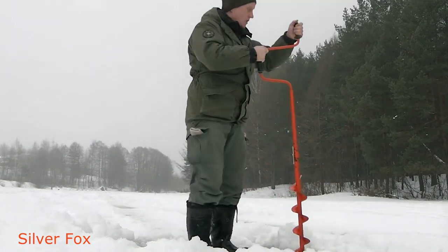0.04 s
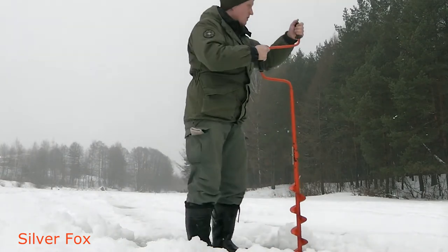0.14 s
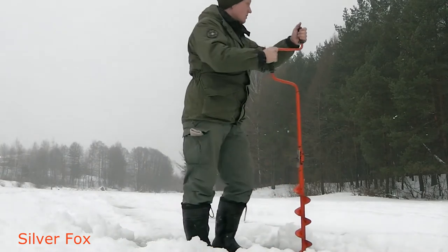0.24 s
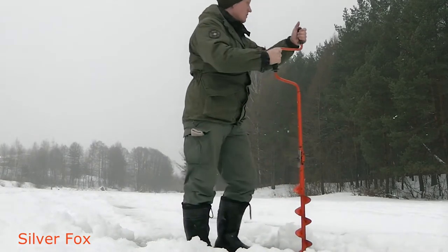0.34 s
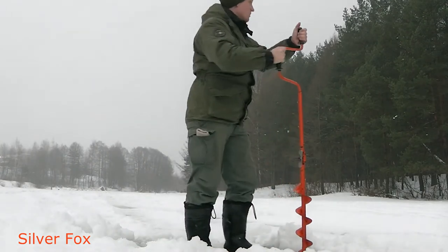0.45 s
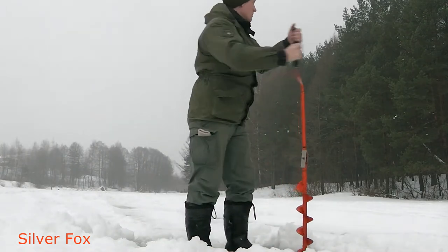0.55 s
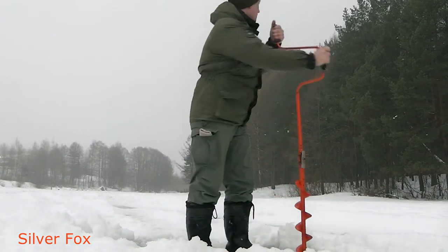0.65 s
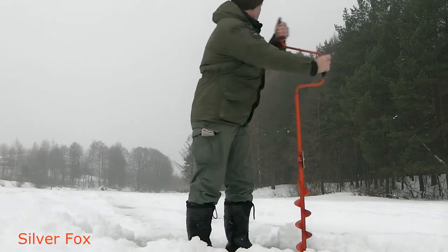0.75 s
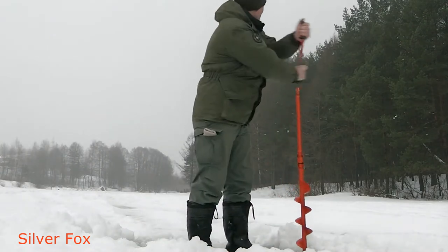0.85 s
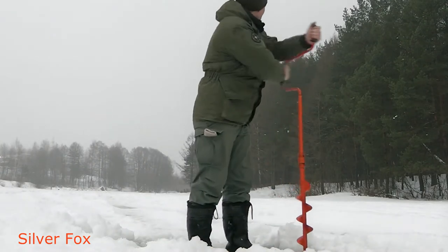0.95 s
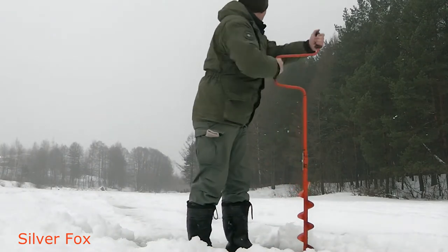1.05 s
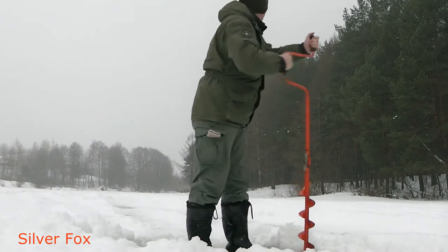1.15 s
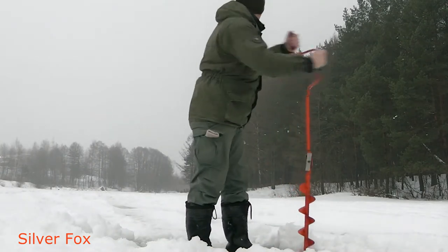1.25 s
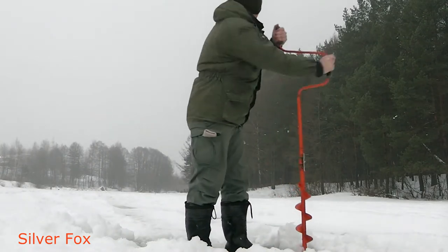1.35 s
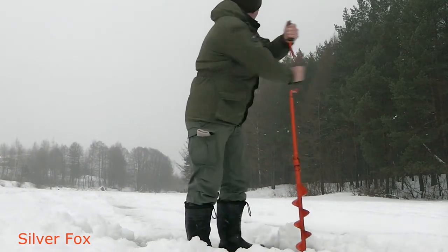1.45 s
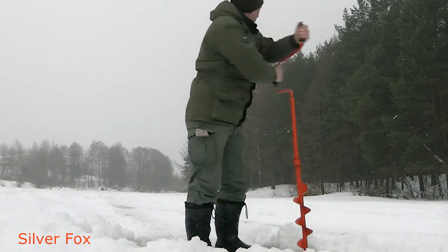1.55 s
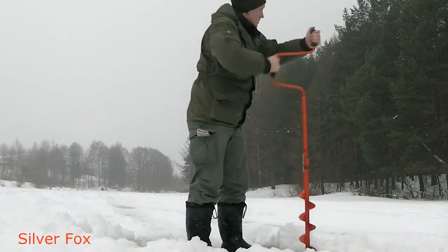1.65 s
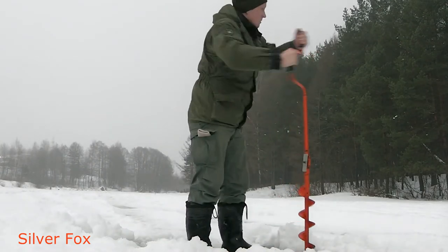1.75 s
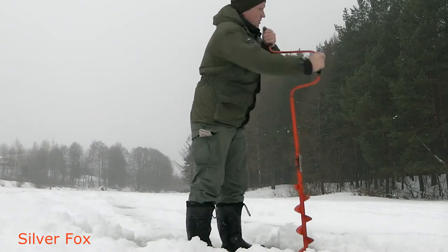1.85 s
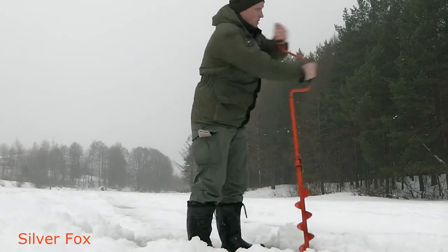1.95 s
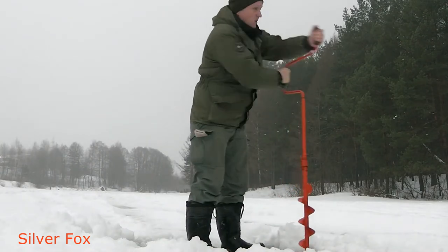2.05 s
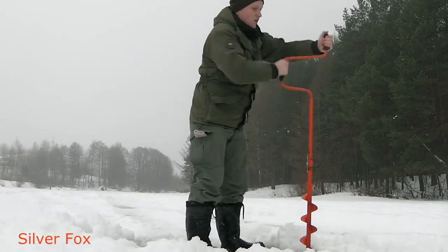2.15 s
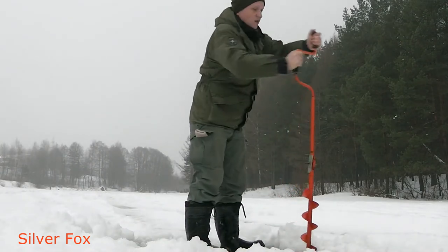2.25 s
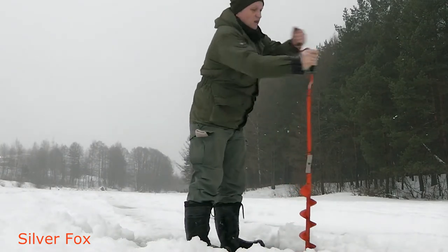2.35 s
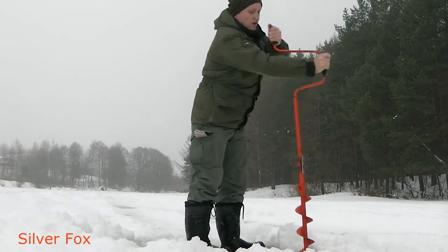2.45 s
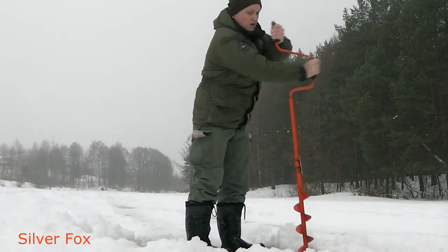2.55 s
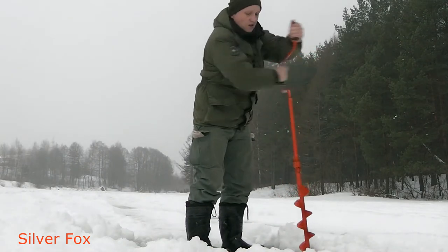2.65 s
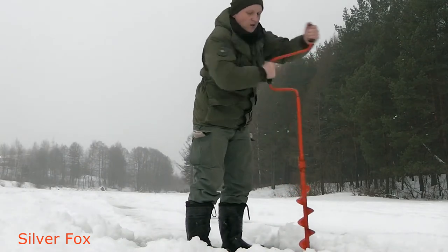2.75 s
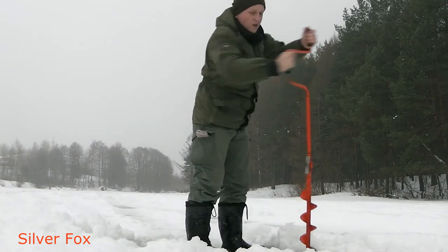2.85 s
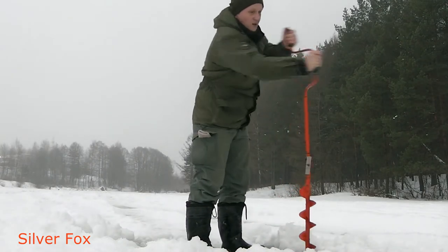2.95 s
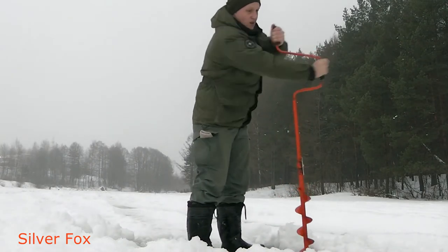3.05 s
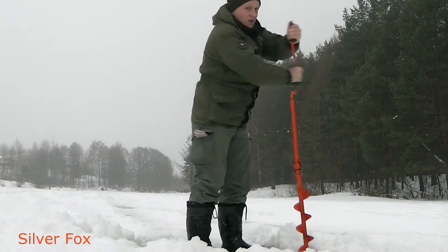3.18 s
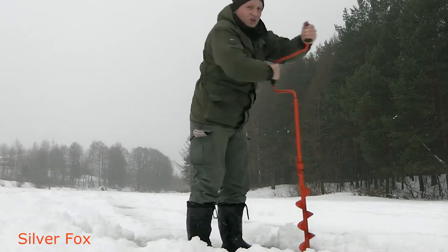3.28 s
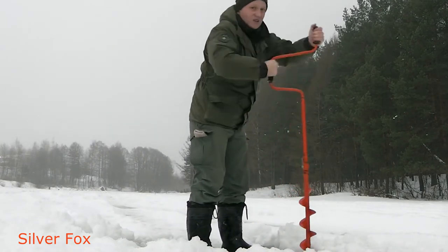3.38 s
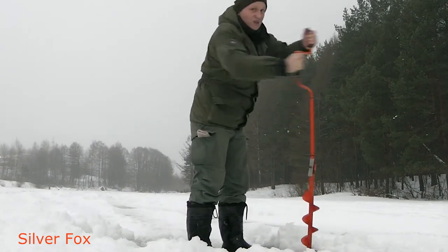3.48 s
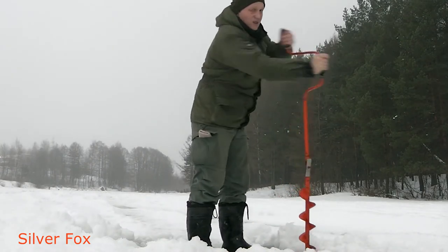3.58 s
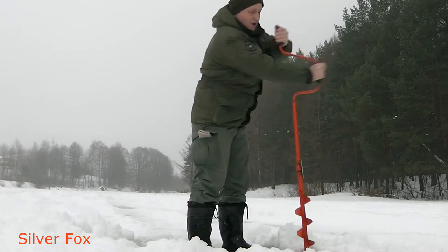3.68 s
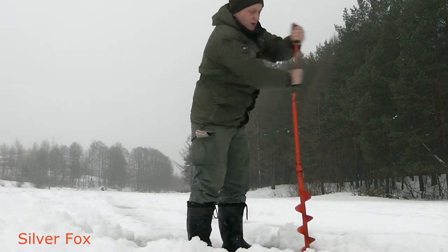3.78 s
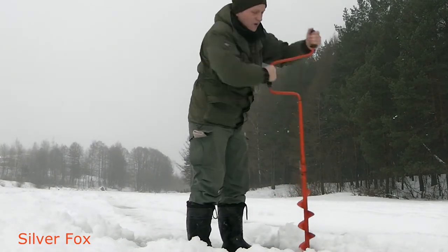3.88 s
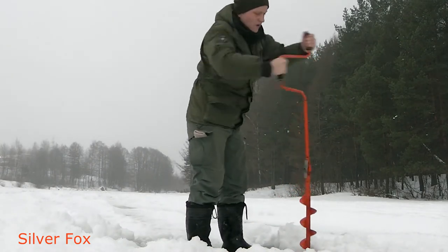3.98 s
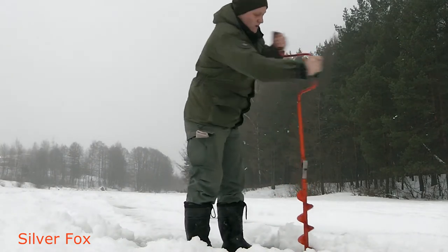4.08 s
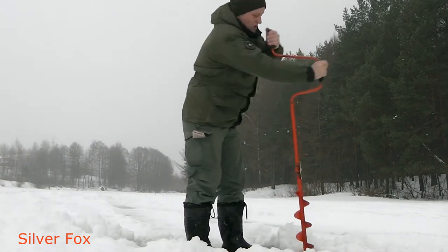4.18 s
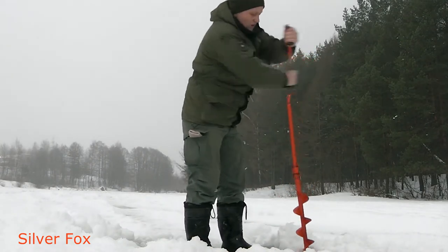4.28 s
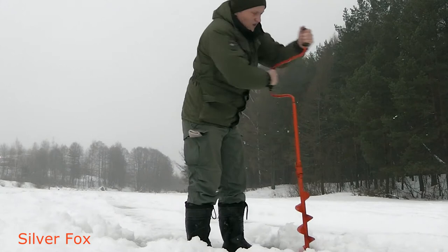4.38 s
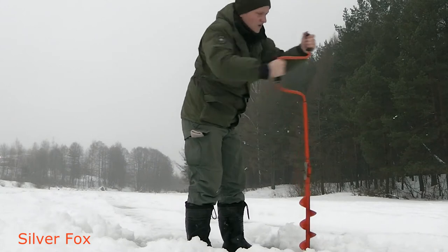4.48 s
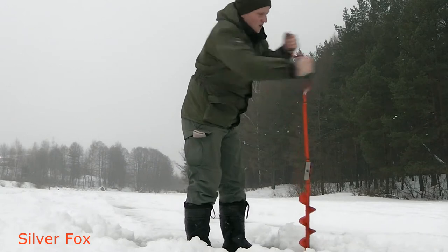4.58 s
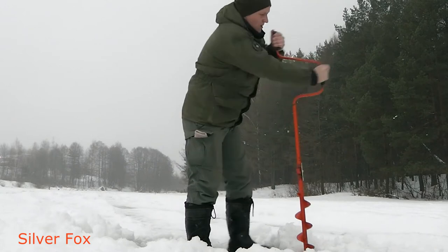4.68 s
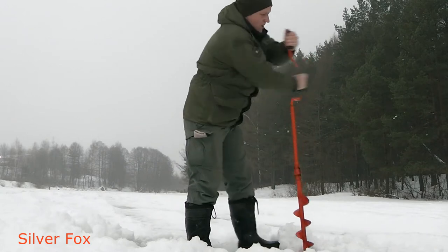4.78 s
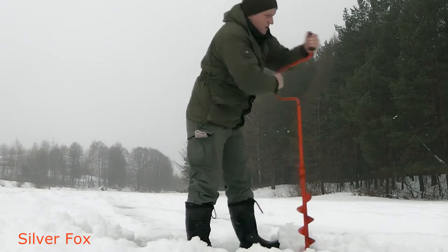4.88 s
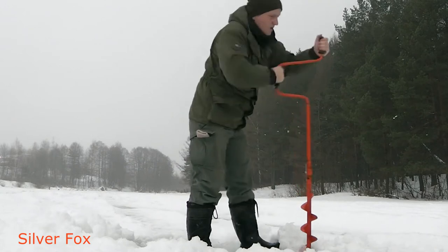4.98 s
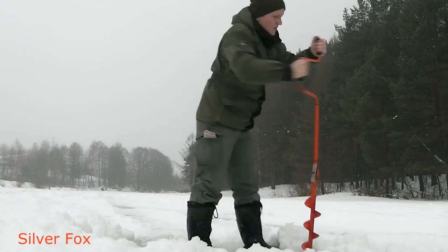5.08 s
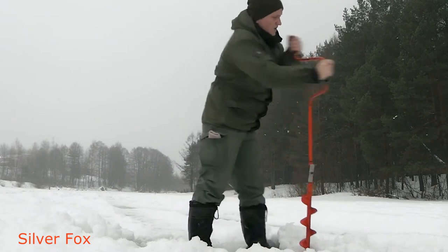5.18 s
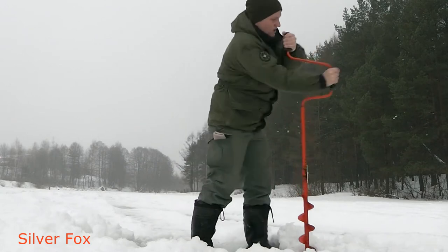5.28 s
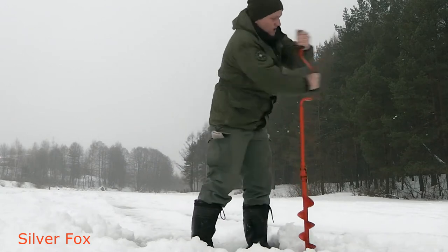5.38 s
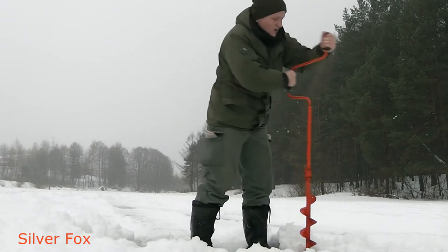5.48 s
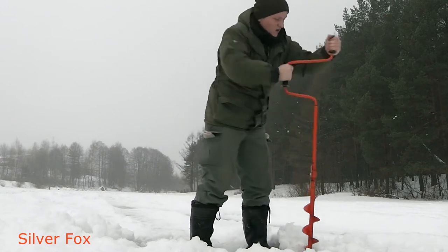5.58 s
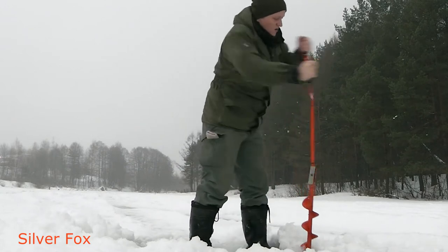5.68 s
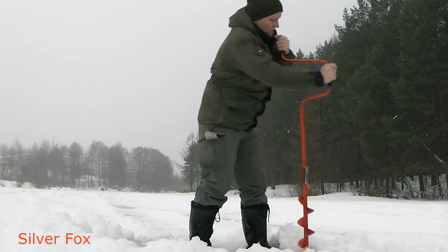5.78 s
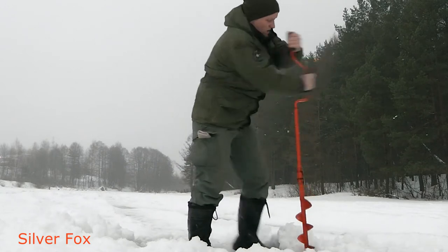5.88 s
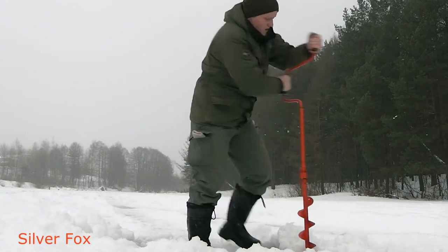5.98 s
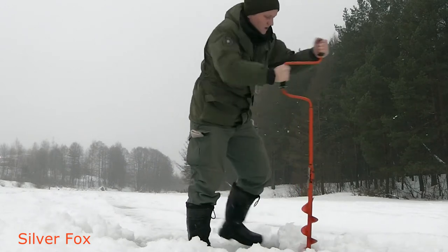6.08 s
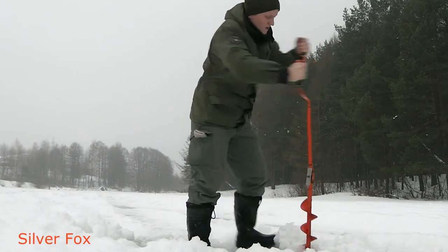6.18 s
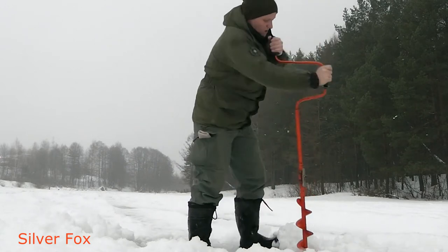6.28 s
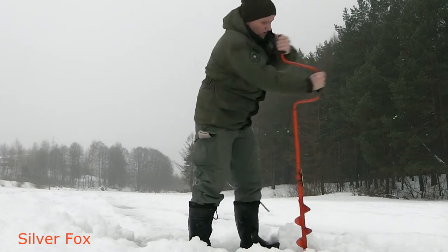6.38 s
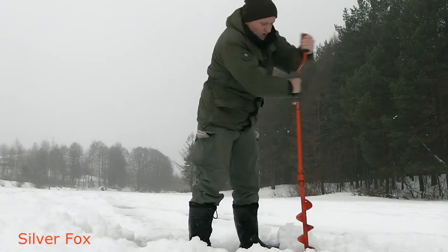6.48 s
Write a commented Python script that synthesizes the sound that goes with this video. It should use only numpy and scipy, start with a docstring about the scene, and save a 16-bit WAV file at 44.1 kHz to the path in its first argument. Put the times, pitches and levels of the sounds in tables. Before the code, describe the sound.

Rhythmic icy grinding as a manual drill bites down, its hole resonating lower and lower, steel ringing, shavings hissing and lumps snapping in light wind.

```python
"""A hand auger is cranked down through river ice, a few metres from the microphone on open snow.
Its blades shear off random chips: the air in the hole resonates and booms at a sinking, wavering
pitch, the steel shaft rings in narrow modes and the shavings hiss as clumped, coloured noise.
Crumbs crunch, lumps crack as short noise bursts, a boot scuffs and dull knocks swing low.
Light wind and a distant wash, both filtered noise, lie underneath."""
import sys
import numpy as np
from scipy import signal
from scipy.fft import rfft, irfft, next_fast_len
from scipy.io import wavfile
from scipy.ndimage import uniform_filter1d

SR = 44100
rng = np.random.default_rng(int(sys.argv[2]) if len(sys.argv) > 2 else 0)


def amplitude_ratio(level_db):
    """Convert a level in decibels to the matching linear amplitude (field) ratio."""
    exponent = np.asarray(level_db, float) / 20
    return 10 ** exponent


def to_wav(sig):
    """Store sig (one row per channel, or 1-D mono) as 16-bit WAV at the path in sys.argv[1].

    Samples outside -1..1 are clipped; the rate is SR.
    """
    pcm = np.clip(np.atleast_2d(sig), -1, 1) * 32767
    pcm = np.round(pcm).astype(np.int16)
    wavfile.write(sys.argv[1], SR, pcm.T)  # frames by channels


N = 287973  # length [samples]


def evened(x):
    """Scales to rms 1."""
    return x / np.sqrt(np.mean(abs(x) ** 2) + 1e-20)


def read(points, hz):
    """Reads a spectrum on a log-frequency axis."""
    point_hz, value = np.transpose(points)
    return np.interp(np.log(hz + 1), np.log(point_hz + 1), value)


def curves(rows):
    """Every column of a table at sample rate, against its first column, time."""
    s, *columns = np.transpose(rows)
    return [np.interp(np.arange(N) / SR, s, column) for column in columns]


def swells(rows, rest_db, rise, fall, column=2):
    """Level in dB: each row rises, holds and falls at set dB per second above a resting level."""
    t = np.arange(N) / SR
    power = amplitude_ratio(2 * rest_db)
    for row in rows:
        start, hold = row[0], row[1]
        before = np.maximum(start - t, 0)
        after = np.maximum(t - start - hold, 0)
        power = power + amplitude_ratio(2 * (row[column] - rise * before - fall * after))
    return 10 * np.log10(power)


def colour(x, points):
    """Filters x by a spectrum in dB."""
    size = next_fast_len(N)
    gain = amplitude_ratio(read(points, np.fft.rfftfreq(size, 1 / SR)))
    return irfft(rfft(x, size) * gain, size)[:N]


def resonate(x, hz, width_hz, order=2):
    """A resonance that follows the curve hz: shift down, smooth order times, shift back."""
    turn = np.exp(2j * np.pi * np.cumsum(hz * np.ones(N)) / SR)
    x = x / turn
    for _ in range(order):  # width_hz is that of one pass
        x = signal.lfilter([1], [1, -np.exp(-np.pi * width_hz / SR)], x)
    return evened((turn * x).real)


def wobble(ms):
    """Smooth random curve of rms 1 that changes over about ms."""
    size = max(round(ms * SR / 1000), 1)
    return evened(uniform_filter1d(uniform_filter1d(rng.standard_normal(N), size), size))


def chips(per_s, spread_db):
    """Ice chips breaking off at random moments, as single-sample clicks of random size and sign."""
    size = amplitude_ratio(spread_db * np.minimum(rng.exponential(1, N), 5))
    breaks = rng.random(N) < per_s / SR
    return evened(size * breaks * rng.choice([-1., 1.], N))


def steadied(x, ms, share):
    """Evens out part of the slow random level swings of the noise."""
    size = round(ms * SR / 1000)
    power = uniform_filter1d(uniform_filter1d(x ** 2, size), size)
    return evened(x / (abs(power) + 1e-3) ** (share / 2))


def patchy(x, size, bins, frames, db):
    """Random patches of colour, bins wide and frames long, drift over x."""
    z = signal.stft(x, nperseg=size, noverlap=size * 3 // 4)[2]
    field = uniform_filter1d(rng.standard_normal(z.shape), bins, 0)
    field = uniform_filter1d(field, frames, 1)
    return signal.istft(z * amplitude_ratio(db * evened(field)), nperseg=size, noverlap=size * 3 // 4)[1][:N]


# light wind over open snow: (time [s], level [dB])
WIND_LEVEL = [(0.0, -42), (1.0, -37), (2.1, -40.5), (4.7, -40.5), (5.0, -37.5), (6.05, -38.5), (6.53, -41)]
# colour of wind and far wash: (frequency [Hz], relative density [dB])
AIR_SPECTRUM = [(18, -37), (30, -4.5), (97, 0.5), (187, -5), (245, -11.5), (347, -9.5), (926, -19),
                (1080, -16), (1680, -22), (3000, -48), (3900, -60), (6600, -120)]


def air():
    """Low wind and far wash over the snow: filtered noise whose level drifts."""
    return amplitude_ratio(curves(WIND_LEVEL)[0]) * evened(colour(rng.standard_normal(N), AIR_SPECTRUM))


# how hard and fast the crank feeds the blades, as shavings hiss: (time [s], level [dB])
CRANK_FEED = [(0.0, -53.5), (0.18, -59.5), (0.42, -62), (0.55, -50.5), (0.68, -45.5), (1.0, -45.5),
              (1.4, -37), (1.75, -39), (1.81, -45), (1.9, -36), (2.16, -41), (3.1, -36), (3.37, -39),
              (3.7, -35.5), (4.4, -38), (4.75, -35), (5.0, -39), (5.5, -38.5), (6.17, -38.5), (6.53, -37.5)]


def crank_feed():
    """The harder the crank feeds the blades, the louder the shavings."""
    return curves(CRANK_FEED)[0]


# a boot scuffs the crust: (start [s], hold [s], level [dB])
BOOT_SCUFFS = [(0.192, .03, -49), (0.25, 0.049, -46)]


def scuffs(feed_db):
    """A boot scraping the crust briefly lifts the level of the hiss, with steep edges."""
    return swells(BOOT_SCUFFS, feed_db, rise=900, fall=900)


def squeaks(per_s):
    """Short gliding whistles where an edge skids on hard ice."""
    out, t = np.zeros(N), np.arange(1500) / SR
    for place, glide, length in rng.random((30, 3)):  # thirty kinds of whistle
        hz, length_s = 1900 * 4.2 ** place, 0.0071 + 0.043 * length
        whistle = np.sin(2 * np.pi * hz * t * (1 + 1.87 * (glide - .5) * t))
        grain = whistle * np.sin(np.pi * np.minimum(t / length_s, 1)) ** 2
        out += signal.oaconvolve(chips(per_s / 30, spread_db=2.0), evened(grain))[:N]
    return evened(out)


# colour of the shavings' hiss: (frequency [Hz], relative density [dB])
SHAVINGS_SPECTRUM = [(1470, -12.5), (2500, -14), (3100, -13), (3340, -17), (3690, -9.5), (4050, -9),
                     (5420, -3), (6710, -2.5), (7470, 0), (10400, -5.5), (11700, -13), (14900, -24),
                     (15600, -29)]
# steel modes that colour the hiss: (frequency [Hz], one-pass width [Hz], level against the hiss [dB])
HISS_MODES = [(7640, 270, -28), (5470, 190, -35), (8500, 360, -25), (10300, 330, -31)]
# finest powder: (time [s], level against the hiss [dB])
POWDER_LEVEL = [(0, -7), (3, -15), (6.53, -14)]
# what the steel shaft rings with: (frequency [Hz], one-pass width [Hz], relative level [dB])
SHAFT_MODES = [(1126.5, 57, 1), (1161, 114, -2.5), (1253, 26, -7.5)]


def blades(bite, hiss_db, ring_db):
    """Fine grit hisses in clumps and narrow streaks; coarser chips ring the shaft."""
    grit = rng.standard_normal(N) + .5 * chips(per_s=1100, spread_db=-0.5)
    grit = patchy(grit * bite ** 1.2, size=256, bins=8, frames=45, db=2.5)  # clumps
    grit = patchy(grit, size=1024, bins=3, frames=14, db=1.5)  # streaks
    grit = evened(grit) + amplitude_ratio(-11.5) * squeaks(per_s=300)
    hiss = evened(colour(grit, SHAVINGS_SPECTRUM))
    for hz, width_hz, db in HISS_MODES:  # each mode's level wanders by itself
        hiss = hiss + amplitude_ratio(db + 3.6 * wobble(ms=140)) * resonate(grit, hz, width_hz)
    powder = resonate(rng.standard_normal(N) * bite, hz=12700, width_hz=10000)
    hiss = hiss + amplitude_ratio(curves(POWDER_LEVEL)[0]) * powder
    coarse = chips(per_s=970, spread_db=2.5) * bite
    ring = sum(amplitude_ratio(db) * resonate(coarse, hz, width_hz) for hz, width_hz, db in SHAFT_MODES)
    return amplitude_ratio(hiss_db) * hiss + amplitude_ratio(ring_db) * steadied(ring, ms=39, share=0.15)


# colour of the larger crumbs: (frequency [Hz], relative density [dB])
CRUMB_SPECTRUM = [(500, -27), (850, -5.5), (1050, -7), (1400, -8), (1950, -7.5), (2400, -23.5), (3200, -50)]


def crunch(bite, feed_db, drag_db):
    """Larger crumbs break with a duller, patchy rasp that partly follows feed and drag."""
    level_db = -42.5 + 0.76 * (feed_db + 40) + 0.24 * drag_db
    crumbs = (rng.standard_normal(N) + 0.52 * chips(per_s=900, spread_db=5.5)) * bite
    crumbs = patchy(crumbs, size=1024, bins=4, frames=12, db=3.0)
    return amplitude_ratio(level_db) * evened(colour(crumbs, CRUMB_SPECTRUM))


# lumps of ice and crust cracking:
# (time [s], level before an 11 dB cut and the decay [dB], centre [Hz], 60 dB decay time [s])
ICE_CRACKS = [(0.1975, -28.5, 5260, 0.12), (0.289, -34, 5500, 0.088), (0.377, -36, 4990, 0.037),
              (0.4643, -53, 10100, 0.04), (0.475, -28.5, 7800, 0.033), (0.4894, -45, 7020, 0.041),
              (1.33, -27, 7600, 0.033), (2.0454, -19, 8070, 0.046), (3.4012, -37, 5750, 0.036),
              (3.863, -20, 5000, 0.03), (4.1, -23, 8630, 0.074), (4.6703, -8, 5300, 0.033),
              (4.8236, -8.5, 6560, 0.033), (4.862, -14, 7520, 0.033), (4.9064, -19, 4240, 0.04),
              (5.092, -22, 4000, 0.03), (5.262, -15, 5000, 0.035), (5.7107, -18, 5780, 0.04),
              (5.778, -13, 4000, 0.054), (5.814, -12.5, 5900, 0.078), (5.8276, -8, 6060, 0.03),
              (5.8617, -12, 5650, 0.12), (5.893, -19, 5800, 0.04), (6.1953, -21.5, 9870, 0.33),
              (6.32, -13.5, 5500, 0.028), (6.385, -17, 5000, 0.048), (6.422, -14, 6460, 0.047),
              (6.461, -20.5, 4500, 0.035)]


def cracks():
    """Each crack is a sharp burst of noise around its centre that dies quickly."""
    size = 4096
    out, t = np.zeros(N + size), np.arange(size) / SR
    hz = np.fft.rfftfreq(size, 1 / SR)
    noises = rng.standard_normal((len(ICE_CRACKS), size))
    for (s, db, centre_hz, t60), noise in zip(ICE_CRACKS, noises):
        hump_db = -9. * np.log2((hz + 50) / centre_hz) ** 2
        tone = amplitude_ratio(hump_db + 0.29 * read(SHAVINGS_SPECTRUM, hz))
        tone = tone + 1 / (1 + (hz / 2200) ** 4)  # low body of the lump
        burst = evened(irfft(rfft(noise) * tone)) * np.minimum(t / 0.0006, 1)
        out[round(s * SR):][:size] += amplitude_ratio(db - 11.0 - 60 * t / max(t60, .005)) * burst
    return out[:N]


# dull low knocks, of boots or of the shaft against the wall:
# (time [s], level before rise and decay [dB], pitch [Hz])
KNOCKS = [(0.299, -31, 110), (0.321, -35, 110), (0.507, -33, 98), (4.426, -28, 228), (4.99, -28, 140),
          (6.009, -24, 205)]


def thuds():
    """Each knock is a soft, quickly damped low swing."""
    rise_s, t60_s = 0.0048, 0.23
    out, t = np.zeros(N + 8192), np.arange(8192) / SR
    for s, db, hz in KNOCKS:
        envelope = amplitude_ratio(db - 60 * t / t60_s) * np.minimum(t / rise_s, 1)
        out[round(s * SR):][:8192] += envelope * np.sin(2 * np.pi * hz * t)
    return out[:N]


# the blades bite deep and the hole booms: (start [s], hold [s], boom level [dB])
DEEP_BITES = [(1.02, 0.095, -28), (1.39, 0.044, -27), (1.58, 0.13, -23.5), (1.88, 0.053, -24.5),
              (2.04, 0.038, -26), (2.25, 0.17, -34), (2.53, 0.062, -20), (2.73, 0.063, -18.5),
              (2.96, 0.098, -16.5), (3.09, 0.13, -15.5), (3.24, 0.23, -20), (3.55, 0.13, -15),
              (3.82, 0.065, -13), (3.97, 0.072, -21), (4.11, 0.17, -17), (4.35, 0.061, -16),
              (4.53, .2, -21), (4.77, 0.19, -21), (5.01, 0.1, -21.5), (5.19, 0.092, -18.5),
              (5.33, .1, -24.5), (5.5, 0.049, -24), (5.72, 0.073, -21.5), (5.9, 0.03, -21),
              (6.0, 0.054, -22.5), (6.08, .15, -27), (6.33, 0.21, -22)]


def boom_level():
    """The boom swells with each deep bite; between bites it is louder once the hole is deep."""
    t = np.arange(N) / SR
    shallow_db, deep_db = -36.5, -29.5
    rest_db = shallow_db + (deep_db - shallow_db) * np.clip((t - 2.4) / .2, 0, 1)
    return swells(DEEP_BITES, rest_db, rise=236, fall=417)


# air pitch of the hole, sinking with depth and wavering as shavings fill and leave it:
# (time [s], pitch before jitter [Hz])
HOLE_PITCH = [(0.7, 629), (2.0, 642), (2.75, 615), (2.96, 655), (3.17, 547), (3.38, 629), (3.6, 555),
              (3.88, 455), (4.05, 536), (4.12, 486), (4.2, 528), (4.4, 408), (4.5, 355), (4.56, 445),
              (4.7, 434), (4.85, 360), (4.95, 367), (5.02, 425), (5.3, 374), (5.9, 348), (6.03, 438),
              (6.07, 320), (6.4, 371), (6.53, 427)]


def hole(bite, drag_db):
    """Chips excite the air column; its pitch jitters as the load of shavings shifts."""
    t = np.arange(N) / SR
    hz = curves(HOLE_PITCH)[0]
    over_hz = np.clip(1.82 * hz, 757, 843)
    drive = (chips(per_s=1500, spread_db=3.5) + 0.57 * rng.standard_normal(N)) * bite

    jitter = 0.023 + 0.026 * np.clip((t - 4.3) / 0.26, 0, 1)  # more in a full hole
    hz = hz * (1 + jitter * wobble(ms=28.5))
    wide = (hz / 600) ** 0.33 * resonate(drive, 1.062 * hz, width_hz=175, order=4)  # a shallow hole leaks
    boom = resonate(drive, hz, width_hz=64) + amplitude_ratio(-7.0) * wide
    sinking_in = np.clip((t - .6) / 0.39, 0, 1) ** 2  # the blades sink in
    boom = sinking_in * steadied(boom, ms=27, share=0.52)
    boom_db = boom_level()

    # shavings rasp up the hole, 9 dB louder each second until 3.95 s
    rasp = resonate(drive, hz=563, width_hz=216, order=3)
    rasp = patchy(rasp, size=2048, bins=3, frames=8, db=1.0)
    rasp_db = -29 - 9 * np.maximum(3.95 - t, 0) + 0.21 * drag_db

    over = steadied(resonate(drive, over_hz, width_hz=130, order=3), ms=32, share=0.42)
    over = np.clip((t - 2.3) / .5, 0, 1) * over
    over_db = drags(rest_db=-45, column=3)

    flex = np.clip((t - .9) / 1.43, 0, 1) * resonate(drive, hz=338, width_hz=39)  # lowest flex of the shaft
    flex = amplitude_ratio(-35.5 + .35 * boom_db) * flex
    return amplitude_ratio(boom_db) * boom + amplitude_ratio(rasp_db) * evened(rasp) + amplitude_ratio(over_db) * over + flex


# the flights drag on the wall:
# (start [s], hold [s], steel ring level [dB], level of the hole's overtone before its fade-in [dB])
WALL_DRAGS = [(0.81, 0.034, -42, -62), (1.33, 0.042, -39, -60), (1.62, 0.18, -47, -60),
              (1.9, 0.031, -40.5, -60), (2.05, 0.044, -44, -60), (2.36, 0.15, -41, -60),
              (2.6, .2, -51, -61), (2.9, 0.11, -40.5, -47), (3.1, 0.14, -42.5, -48), (3.55, .1, -33.5, -39),
              (3.805, 0.08, -33, -28.5), (4.07, 0.13, -39, -51), (4.24, 0.05, -35, -43),
              (4.355, 0.097, -32.5, -22.5), (4.74, 0.24, -37, -34), (5.17, 0.095, -31.5, -28),
              (5.41, 0.15, -34, -32), (5.7, .06, -33, -32), (5.78, 0.059, -25.5, -26.5),
              (5.92, 0.11, -36.5, -32.5), (6.12, 0.03, -63, -29), (6.27, 0.057, -27, -27.5),
              (6.48, 0.055, -38, -37)]


def drags(rest_db, column):
    """Flights rubbing the wall swell the steel ring (column 2) or the hole's overtone (column 3)."""
    return swells(WALL_DRAGS, rest_db, rise=268, fall=450, column=column)


def scene():
    """One uneven bite of the blades drives hole, shaft and shavings together."""
    bite = amplitude_ratio(0.59 * wobble(ms=35.0) + 1.26 * wobble(ms=1.96))
    feed_db = scuffs(crank_feed())
    ring_rest_db = feed_db - 8.5
    ring_db = drags(ring_rest_db, column=2)
    drag_db = ring_db - ring_rest_db  # how far a drag lifts the ring
    mid = hole(bite, drag_db) + blades(bite, feed_db + 0.17 * drag_db, ring_db)
    mid = mid + crunch(bite, feed_db, drag_db) + cracks() + thuds() + air()
    return np.array([mid, mid])


def roll_off(x):
    """The treble ends steeply here."""
    return signal.sosfilt(signal.butter(12, 15740, fs=SR, output="sos"), x)


# stereo difference, strong above about 9 kHz: (frequency [Hz], approximate level against the sum [dB])
STEREO_DIFFERENCE = [(25, -5.5), (60, -43), (150, -26), (350, -23.5), (800, -30.5), (2000, -19),
                     (5000, -16), (8000, -27), (9500, -9), (12000, 0.5), (15500, -11)]


def record(dry):
    """Left and right differ by a phase-turned and a scattered part, with a level set by frequency."""
    hz, _, z = signal.stft(dry[0], SR, nperseg=2048)
    scatter = np.exp(2j * np.pi * rng.random(z.shape))
    turned = np.exp(1j * (3.3 - 1.12 * hz[:, None] / 12000))
    z = z * amplitude_ratio(read(STEREO_DIFFERENCE, hz))[:, None] * (0.84 * turned + 0.4 * scatter)
    side = signal.istft(z, SR, nperseg=2048)[1][:N]
    lowpass = signal.firwin(511, 15740, window=("kaiser", 9), fs=SR)  # the treble ends steeply
    pair = signal.oaconvolve(dry + np.array([side, -side]), lowpass[None], "same")
    return roll_off(pair)


dry = scene()
out = record(dry)
to_wav(out)
```